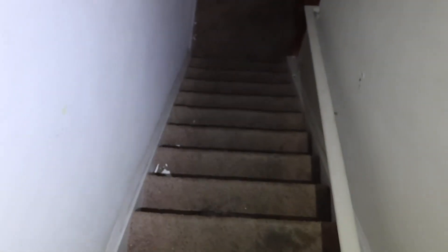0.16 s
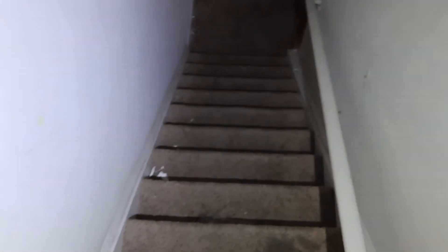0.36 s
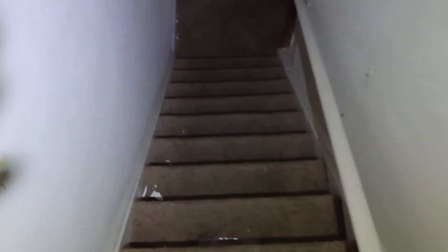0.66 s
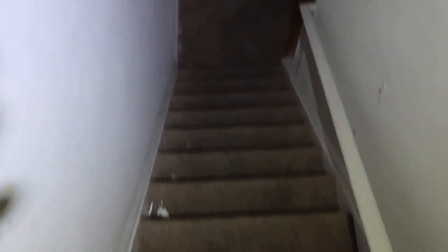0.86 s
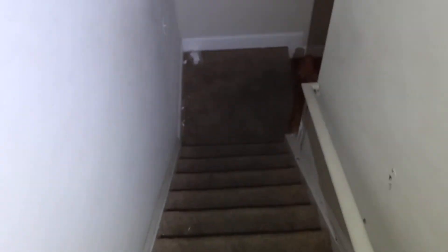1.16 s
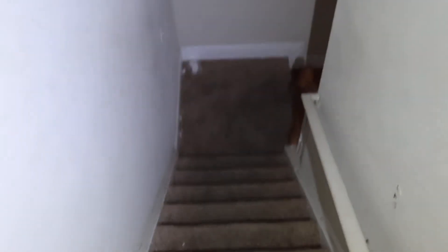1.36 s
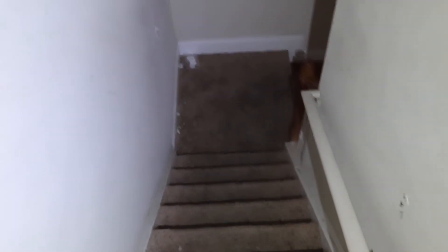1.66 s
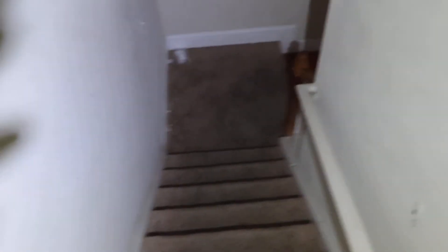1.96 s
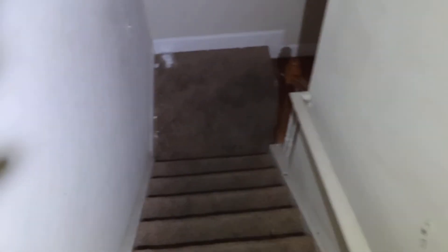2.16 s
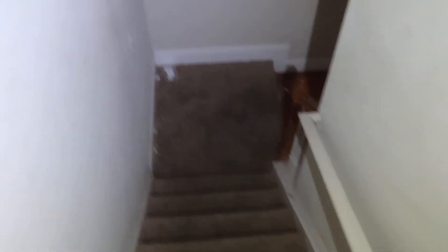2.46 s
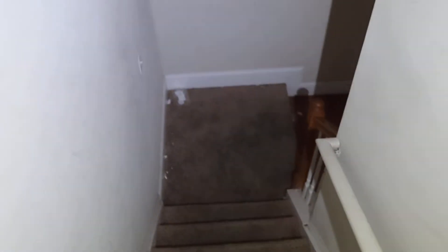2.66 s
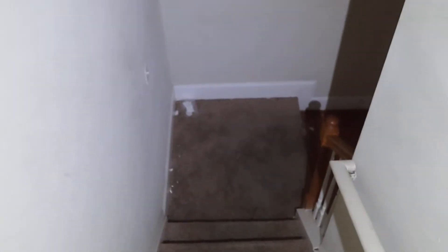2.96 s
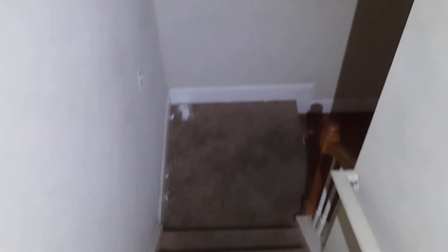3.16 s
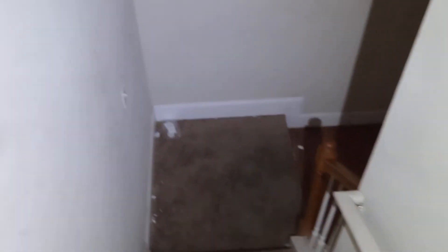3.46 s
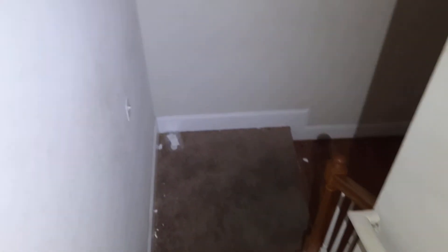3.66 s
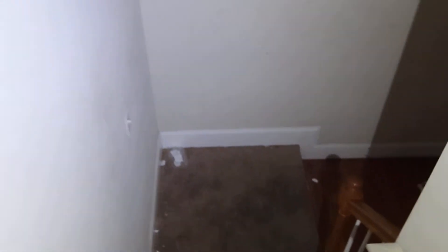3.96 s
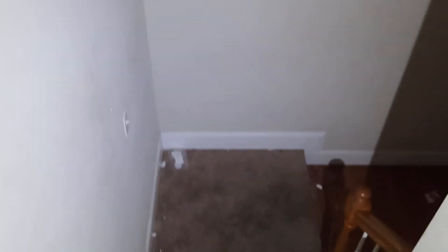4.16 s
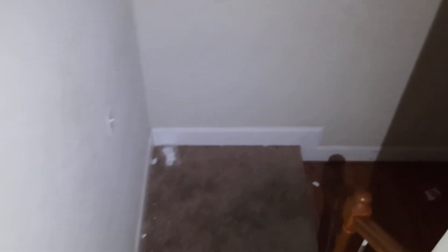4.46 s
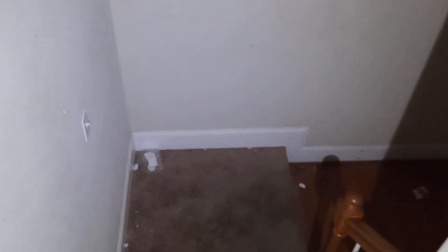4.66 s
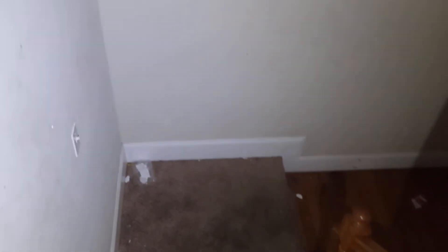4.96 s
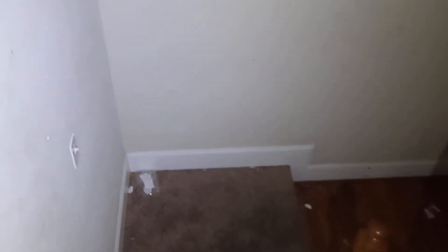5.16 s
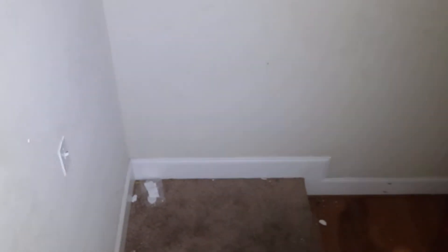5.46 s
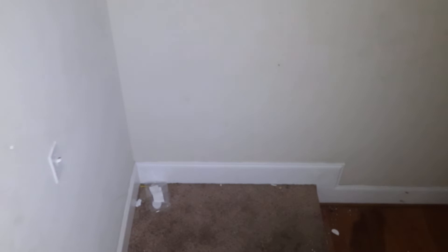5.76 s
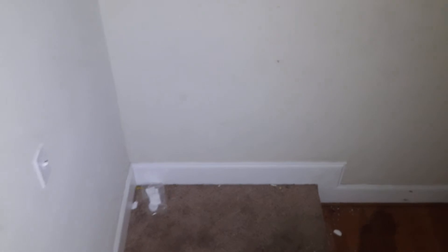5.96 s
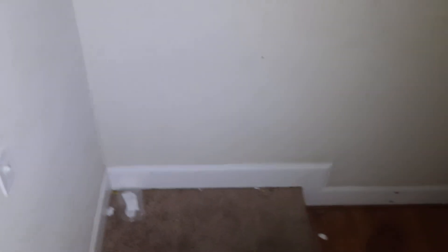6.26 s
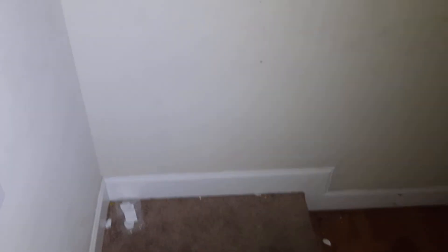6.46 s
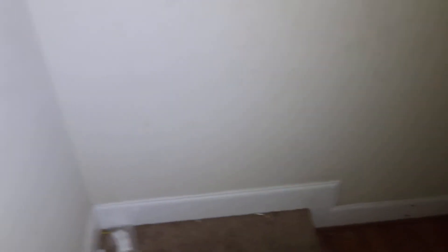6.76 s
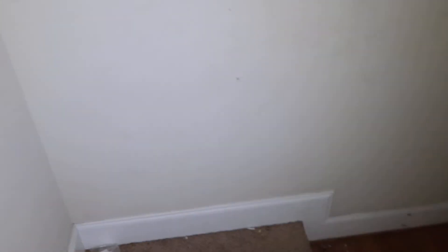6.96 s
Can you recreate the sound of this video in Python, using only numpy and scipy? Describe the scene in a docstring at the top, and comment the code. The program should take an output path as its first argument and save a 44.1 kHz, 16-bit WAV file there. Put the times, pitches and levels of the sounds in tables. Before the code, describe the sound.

Muffled footsteps descend a carpeted staircase, boards knocking, soles scuffing and clothing brushing the microphone, with a deep heavier step near six seconds.

```python
"""A woody knock in the still air of an empty house, then someone walks down carpeted wooden stairs.
Each foot lands as a soft thump of a damped board, and the treads knock in frame modes and dense noise.
Filtered noise rubs as the sole moves over the pile; now and then clothing brushes the housing of the
carried microphone and rings its resonances. The heaviest step comes late; bare walls return an echo."""
import sys
import numpy as np
from scipy import signal
from scipy.fft import rfft, irfft, next_fast_len
from scipy.io import wavfile

SR = 44100
rng = np.random.default_rng(int(sys.argv[2]) if len(sys.argv) > 2 else 0)


def output_pcm(signal):
    """Save a mono or channel-first signal as 16-bit PCM at the path in sys.argv[1].

    Samples are clipped to [-1, 1] before scaling.
    """
    pcm = np.clip(np.atleast_2d(signal).T, -1, 1) * 32767
    wavfile.write(sys.argv[1], SR, np.round(pcm).astype(np.int16))


N = 313110
TIME = np.arange(N) / SR
RING_TIME = TIME[:SR // 2]   # s
CUTOFF_HZ = 15600


def from_db(db):
    """Decibels to gain."""
    return 10 ** (np.asarray(db) / 20)


def rms_one(x):
    """Scale to unit rms."""
    return x / np.sqrt(np.mean(x ** 2) + 1e-20)


def at_hz(points, hz):
    """Read a table on a log-frequency axis."""
    points = np.array(points)
    return np.interp(np.log(np.maximum(hz, 1)), np.log(points[:, 0]), points[:, 1])


def add(out, s, sound):
    """Mix a sound in from time s."""
    start = max(0, round(s * SR))
    out[..., start:start + sound.shape[-1]] += sound[..., :N - start]


def low_pass(x, hz, order=2):
    """Causal Butterworth low-pass."""
    sos = signal.butter(order, min(hz, SR / 2 - 1), fs=SR, output="sos")
    return signal.sosfilt(sos, x + 1e-18)


def left_right(mid, side):
    """Two channels from their sum and difference."""
    return np.array([mid + side, mid - side])


def flutter(per_s, depth_db, size=N):
    """A gain that wanders at random between per_s points a second."""
    wander = np.interp(TIME[:size] * per_s, np.arange(size), rng.standard_normal(size))
    return from_db(depth_db * wander)


def swell(t, rise_s, fade_s):
    """Pressure of a rubbing contact: it builds, rounds off at 1 when t is 0, and lets go."""
    scaled = np.where(t < 0, t / rise_s, t / fade_s)
    return np.exp(1 - np.hypot(1, scaled * np.sqrt(2)))


def steady_noise(spectrum, width, size=N):
    """Stereo noise of a given colour and width; its middle has rms 1."""
    padded = next_fast_len(size)
    hz = np.arange(padded // 2 + 1) * SR / padded
    colour = from_db(at_hz(spectrum, hz)) * (hz < CUTOFF_HZ) * (hz > 20)
    mid, side = rfft(rng.standard_normal((2, padded))) * colour
    mid, side = irfft([mid, side * from_db(at_hz(width, hz))], padded)[:, :size]
    return left_right(mid, side) / np.std(mid)


# Centres of the bands that decay separately, in Hz.
BAND_HZ = np.array([150, 600, 2400, 9600])


def noise_bands(spectrum, width):
    """Coloured stereo noise split into four overlapping bands: (band, channel, time)."""
    noise = steady_noise(spectrum, width, size=2 * SR)
    hz = np.arange(SR + 1) / 2
    shares = [at_hz(np.column_stack([BAND_HZ, own]), hz) for own in np.eye(len(BAND_HZ))]
    return np.array([irfft(rfft(noise) * share) for share in shares])


def dying(t60_s):
    """Exponential decay, 60 dB down after t60_s (10 ms at least)."""
    return np.exp(-np.log(1000) * RING_TIME / np.maximum(t60_s, .01))


def dense_ring(bands, t60s):
    """Countless modes at once: a random stretch of noise in which each band dies at its own rate."""
    start = rng.integers(bands.shape[-1] - len(RING_TIME))
    stretch = bands[..., start:start + len(RING_TIME)]
    return np.einsum("bct,bt->ct", stretch, dying(t60s[:, None]))


# Still air of the house. Each row: frequency in Hz, relative density in dB per Hz.
HOUSE_AIR = [(15, -1), (25, 11), (49, -0.5), (101, 1.5), (289, -5.5), (433, -7.5), (469, -8), (598, -12.5),
             (1300, -13.5), (1900, -20.5), (2060, -28), (3630, -23), (12000, -37.5), (15500, -48)]
# Stereo width of the air. Each row: frequency in Hz, side minus mid in dB.
AIR_WIDTH = [(60, -29), (110, -10.5), (200, -2.5), (380, 2.5), (700, 0.5), (1290, -2.5), (2380, 5.5),
             (4400, -4), (8120, -19), (15000, -30)]


def house_air(air_db=-50.0):
    """Still air: steady noise, strongest in the bass."""
    return from_db(air_db) * steady_noise(HOUSE_AIR, AIR_WIDTH)


# Decay of the bare stairwell. Each row: frequency in Hz, t60 in s.
HALL_T60 = [(150, 0.42), (600, 0.41), (2400, 0.45), (9600, 0.35)]
# Colour of its tail. Each row: frequency in Hz, relative density in dB per Hz.
HALL_COLOUR = [(50, 7.5), (400, 6), (2000, 5), (15000, -3)]
# Width of its tail. Each row: frequency in Hz, side minus mid in dB.
HALL_WIDTH = [(60, -64), (300, -30), (2000, -27), (8000, -3)]


def stairwell(x, wet_db=-12, first_echo_s=0.003):
    """Bare walls return a diffuse tail."""
    air = noise_bands(HALL_COLOUR, HALL_WIDTH)
    onset = np.clip(RING_TIME / first_echo_s - 1, 0, 1)
    tail = dense_ring(air, at_hz(HALL_T60, BAND_HZ)) * onset
    tail = tail / np.linalg.norm(tail[0])
    return from_db(wet_db) * signal.fftconvolve(x, tail, axes=-1)[:, :N]


def side_walls(x, echo_db=-9, sway_db=2.0):
    """The two close walls each return one echo, whose delay wanders as the walker sways."""
    out = x.copy()
    for delay_s in (.0031, .0054):
        sent = TIME - delay_s * flutter(3, sway_db)
        out += from_db(echo_db) * np.array([np.interp(sent, TIME, channel) for channel in x])
    return out


# Strides. Each row: peak in seconds, sole in dB before sole_db, clothes in dB before cloth_db,
# swell in s, fade in s.
STRIDES = [(.65, -44.5, -62.5, 0.15, 0.28), (1.21, -39, -60, 0.11, 0.17), (2.1, -41, -60, 0.14, 0.16),
           (2.675, -38.5, -60.5, 0.12, 0.089), (3.41, -44, -60.5, 0.17, 0.21),
           (3.96, -38.5, -59, 0.077, 0.12), (4.71, -46, -62.5, 0.17, 0.2), (5.36, -43, -65, 0.16, 0.12),
           (6.27, -44, -67.5, 0.17, 0.24), (6.77, -41, -62.5, 0.093, 0.085)]
# Lighter scuffs as the weight shifts. Each row: peak in seconds, sole in dB before sole_db.
SCUFFS = [(.12, -52), (1.02, -44), (1.579, -54.5), (1.9, -53), (2.46, -47), (3, -53.5), (3.79, -45.5),
          (4.33, -48.5), (4.53, -50), (5.12, -47), (5.6, -55), (5.98, -52.5), (6.6, -47.5), (6.87, -45)]
# Rubbing sole. Each row: frequency in Hz, relative density in dB per Hz.
SOLE = [(30, -23), (70, 7), (180, 3.5), (300, 0.5), (460, 2.5), (750, -5), (1200, -9), (2300, -13.5),
        (3500, -20.5), (6000, -30), (15000, -48.5)]
# Rustling clothes. Each row: frequency in Hz, relative density in dB per Hz.
CLOTH = [(200, -10), (480, 14), (1000, 7.5), (2200, 11.5), (3400, 5), (4800, 2), (6500, -2.5), (8600, -9),
         (11500, -15), (15000, -18)]
# Stereo width of the steps. Each row: frequency in Hz, side minus mid in dB.
STEP_WIDTH = [(60, -42), (200, -65), (700, -21), (1300, -16), (2400, -12.5), (4400, -5.5), (8000, 1),
              (15000, 10)]
# Stereo width of the clothes. Each row: frequency in Hz, side minus mid in dB.
CLOTH_WIDTH = [(200, -37), (1300, -23), (2400, -8.5), (4400, -5), (7000, 0.5), (10000, 6), (15000, 8)]
SCUFF_SWELL_S, SCUFF_FADE_S = 0.079, 0.073
SCUFF_CLOTH_DB = -27   # clothes relative to sole, before both gains
IDLE_SOLE_DB, IDLE_CLOTH_DB = -59.5, -72.5   # never quite still; before both gains


def friction(sole_db=2.0, cloth_db=12.5, sole_grain_db=1.0, cloth_grain_db=1.5,
             shifts_per_s=25, shift_db=1.5):
    """Soles catch and slip in the pile, clothes rustle with each stride and scuff: fluttering noise."""
    scuffs = [(s, db, db + SCUFF_CLOTH_DB, SCUFF_SWELL_S, SCUFF_FADE_S) for s, db in SCUFFS]
    t = TIME[::50]
    power = from_db([[IDLE_SOLE_DB], [IDLE_CLOTH_DB]]) ** 2
    for s, rub_db, rustle_db, rise_s, fade_s in [*STRIDES, *scuffs]:
        power = power + (from_db([[rub_db], [rustle_db]]) * swell(t - s, rise_s, fade_s)) ** 2
    rub, rustle = [np.interp(TIME, t, np.sqrt(layer)) for layer in power]
    rub = rub * flutter(shifts_per_s, shift_db) * flutter(130, sole_grain_db)
    rustle = rustle * flutter(250, cloth_grain_db)
    sole = from_db(sole_db) * rub * steady_noise(SOLE, STEP_WIDTH)
    cloth = from_db(cloth_db) * rustle * steady_noise(CLOTH, CLOTH_WIDTH)
    return sole + cloth


CATCHES_PER_S, CATCH_DB = 500, 2.8   # quick uneven catches of dragged cloth
FITS_PER_S, FITS_DB = 70, 3   # slower fits
# Cloth sliding to a stop. Each row: start in seconds, level in dB before the pressure envelope,
# length in s, starting pitch in Hz.
SWISHES = [(0.85, -65, 0.036, 8200), (0.89, -60, 0.1, 4700), (2.162, -54, .09, 6430),
           (2.227, -58.5, 0.12, 5040), (3.542, -58, 0.078, 5380), (4.85, -53, 0.063, 5260),
           (6.316, -53.5, 0.079, 6920)]
SWISH_WIDTH_HZ = 600
SWISH_REST_HZ, SWISH_SLOWING_S = 4150, 0.071   # pitch sinks towards rest


def swishes(side_db=-4):
    """Threads pass at a rate set by the speed of the cloth: a rough hiss that falls in pitch."""
    out = np.zeros((2, N))
    size = len(RING_TIME)
    for s, db, length_s, start_hz in SWISHES:
        hz = SWISH_REST_HZ + (start_hz - SWISH_REST_HZ) * np.exp(-RING_TIME / SWISH_SLOWING_S)
        uneven = low_pass(rng.standard_normal((2, size)), SWISH_WIDTH_HZ / 2)
        uneven = uneven * flutter(CATCHES_PER_S, CATCH_DB, size=size)
        mid, side = rms_one(uneven * np.sin(2 * np.pi * np.cumsum(hz) / SR))
        pressure = np.sin(np.pi * np.minimum(RING_TIME / length_s, 1))
        pressure = pressure * flutter(FITS_PER_S, FITS_DB, size=size)
        add(out, s, from_db(db) * pressure * left_right(mid, side * from_db(side_db)))
    return out


def resonate(x, hz, width_hz):
    """A two-pole resonance with gain 1 at its top."""
    r = np.exp(-np.pi * width_hz / SR)
    zeros = np.array([1, 0, -1]) * (1 - r * r) / 2
    poles = [1, -2 * r * np.cos(2 * np.pi * hz / SR), r * r]
    return signal.lfilter(zeros, poles, x + 1e-18)


# Clothing on the housing. Each row: peak in seconds, drag in dB before drive_db, swell in s, fade in s,
# rasp centre in Hz before detuning, rasp width in Hz, gain of low modes in dB, gain of high modes in dB.
BRUSHES = [(.675, -47, 0.033, 0.034, 2180, 400, 9, -0.5), (0.541, -60, 0.098, .05, 2205, 400, -3, -2),
           (.79, -43.5, 0.016, 0.036, 2250, 250, -1, 2.5), (.88, -47, 0.049, 0.055, 2270, 300, -5, 1),
           (.875, -36, 0.051, 0.031, 1830, 580, -2, -11.5), (2.235, -49.5, 0.044, 0.057, 2240, 298, 3, 3),
           (3.571, -39, 0.032, 0.021, 2020, 600, 2.5, 0), (4.706, -44.5, 0.018, 0.012, 2230, 500, -11, -3),
           (4.873, -35, 0.025, 0.024, 2200, 280, -1.5, -4), (5.972, -50.5, 0.02, 0.032, 2450, 784, -5, -17),
           (6.033, -51.5, .015, 0.03, 2900, 700, -18, -20), (6.19, -61.5, 0.088, .06, 2200, 400, 0, 4),
           (6.352, -40.5, 0.042, 0.015, 2030, 400, -2.5, -2),
           (6.373, -47.5, 0.021, 0.013, 2200, 400, 9.5, 9), (6.869, -46, 0.021, 0.011, 1900, 980, -2, -14)]
# Housing resonances. Each row: centre in Hz before detuning, width in Hz, gain in dB before the
# brush's own low or high gain, side minus mid in dB.
HOUSING = [(461, 102, 4.5, -36), (1010, 530, -16.5, -13), (2620, 370, -17.5, -5), (4500, 610, -20, 1),
           (6540, 890, -19, 0.5), (7170, 270, -24.5, 4), (9970, 210, -22, 9), (11330, 260, -25, 14.5),
           (12500, 1200, -36, 7), (14100, 180, -24, 12), (15150, 140, -23, 5)]
GRIP_DETUNE = .015   # relative spread


def brushes(drive_db=18, rasp_db=-8, body_hz=700, treble_hz=4000):
    """The weave catches unevenly on the housing and rings it, each mode in fits of its own."""
    out = np.zeros((2, N))
    t = RING_TIME - RING_TIME.mean()
    size = len(t)
    for s, db, rise_s, fade_s, rasp_hz, rasp_width_hz, body_db, treble_db in BRUSHES:
        drag = from_db(db + drive_db) * swell(t, rise_s, fade_s)
        drag = drag * flutter(CATCHES_PER_S, CATCH_DB, size=size)
        rasp = (rasp_hz, rasp_width_hz, rasp_db, -11)
        for hz, width_hz, mode_db, side_db in [*HOUSING, rasp]:
            push = drag * flutter(FITS_PER_S, FITS_DB, size=size) * rng.standard_normal((2, size))
            push = low_pass(push, max(2 * hz, treble_hz))   # soft cloth leaves little hiss above each mode
            gripped_hz = hz * (1 + GRIP_DETUNE * rng.standard_normal())
            mid, side = resonate(push, gripped_hz, width_hz)
            gain = from_db(mode_db + body_db * (hz < body_hz) + treble_db * (hz > treble_hz))
            add(out, s + t[0], gain * left_right(mid, side * from_db(side_db)))
    return out


# Skids of the sole. Each row: peak in seconds, level in dB before the swell, swell in s, fade in s,
# low-pass brightness in Hz.
SKIDS = [(.6, -31.5, 0.0027, 0.019, 2800), (.635, -42, 0.017, .025, 2426),
         (0.685, -41.5, .012, 0.027, 1500), (.853, -34, 0.014, 0.014, 3600),
         (.882, -38.5, .01, 0.012, 2800), (1.196, -44.5, 0.024, 0.017, 3500),
         (2.055, -45, 0.022, 0.029, 1800), (2.098, -35, 0.02, 0.02, 3420), (2.59, -43.5, .008, .015, 4200),
         (2.632, -42.5, 0.02, 0.018, 3800), (2.69, -39, 0.014, .03, 1600), (2.755, -47, 0.013, 0.019, 700),
         (3.405, -41, .018, .025, 4040), (5.405, -46, 0.056, 0.09, 890), (6.765, -40, .025, .04, 1500),
         (6.84, -48.5, 0.016, 0.025, 800)]
# One fibre letting go. Each row: frequency in Hz, relative density in dB per Hz.
PILE = [(100, -17), (250, -5), (480, 0), (800, 2.5), (1800, -6), (3000, -6), (6000, -17.5), (15000, -11)]
FIBRES_PER_S, FIBRE_SPREAD_DB, FIBRE_T60_S = 900, 3.5, .012


def skids():
    """Tufts of pile catch on the sole and snap free at random: a short gritty rub."""
    out = np.zeros((2, N))
    t, pile = RING_TIME - RING_TIME.mean(), noise_bands(PILE, STEP_WIDTH)
    size = len(t)
    for s, db, rise_s, fade_s, bright_hz in SKIDS:
        strength = np.minimum(rng.exponential(1, size), np.pi)
        sizes = from_db(FIBRE_SPREAD_DB * strength) * rng.choice([-1, 1], size)
        snaps = sizes * (rng.random(size) < FIBRES_PER_S / SR)
        fibre = dense_ring(pile, np.full(len(BAND_HZ), FIBRE_T60_S))
        grit = signal.fftconvolve(snaps[None], fibre, axes=-1)[:, :size]
        rub = swell(t, rise_s, fade_s) * rms_one(low_pass(grit, bright_hz))
        add(out, s + t[0], from_db(db) * rub)
    return out


CRACK_S, BOTTOMING_S = .004, .0035   # crack decay, delay of the push


def knock(wood, frame, bright_hz, t60_s, bottoming_gain=3.17, bottoming_hz=480, firm_hz=2200,
          treble_damping=0.11, rise_cycles=0.72):
    """A tread meets its riser: crack, push, frame modes and woody ring; soft contact is duller, slower."""
    ring = dense_ring(wood, t60_s * (BAND_HZ / 500) ** -treble_damping)
    ring = (1 + .5 * np.exp(-RING_TIME / CRACK_S)) * ring
    phase = (np.pi * bottoming_hz * (RING_TIME - BOTTOMING_S)) ** 2
    firmness = min(bright_hz / firm_hz, 1) ** 2
    push = bottoming_gain * firmness * (1 - 2 * phase) * np.exp(-phase)
    loading = 1 - np.exp(-RING_TIME * bright_hz / rise_cycles)
    return low_pass(loading * (ring + frame + push), bright_hz)


# Dense ring of the wood. Each row: frequency in Hz, relative density in dB per Hz.
WOOD = [(70, -51), (130, 8), (200, 0), (300, 5), (450, 0.5), (800, -0.5), (1800, -1.5), (3000, -10.5),
        (6000, -19), (15000, -28)]
TICKS_PER_S, TICK_SPREAD_DB = 4, 6
TICK_MAX_DB, TICK_BRIGHT_HZ, TICK_T60_S = -51, 650, .14


def ticks():
    """Boards tick as their load shifts: faint dull knocks at random moments."""
    out = np.zeros((2, N))
    wood, count = noise_bands(WOOD, STEP_WIDTH), int(TICKS_PER_S * TIME[-1])
    for when, weakness in rng.random((count, 2)):
        gain = from_db(TICK_MAX_DB - TICK_SPREAD_DB * weakness)
        add(out, when * TIME[-1], gain * knock(wood, 0, TICK_BRIGHT_HZ, TICK_T60_S))
    return out


def mode(hz, t60_s):
    """One struck resonance: a decaying sine."""
    return np.sin(2 * np.pi * hz * RING_TIME) * dying(t60_s)


# Modes of the staircase. Each row: frequency in Hz and gain in dB, both before each tread's random
# shift, t60 in s.
STAIR_MODES = [(90, -15.5, 0.13), (127.4, -5.5, 0.09), (182.3, -4, 0.13), (217, -11.5, 0.1),
               (263, -11.5, 0.2), (330.4, -10.5, 0.093), (366, -28, 0.27), (438.2, -12.5, 0.23),
               (449, -12, 0.15), (489, -16, 0.19), (559, -21, 0.19), (660, -4, 0.02)]


def staircase(count, spread_db=5.5, detune=0.007):
    """The frame's answer to a blow on each of several treads, which shift and weight the modes a little."""
    treads = []
    for tread in rng.standard_normal((count, len(STAIR_MODES), 2)):
        answer = 0
        for k, ((hz, db, t60_s), (size, shift)) in enumerate(zip(STAIR_MODES, tread)):
            gain = (-1) ** k * from_db(db + spread_db * size)
            answer = answer + gain * mode(hz * (1 + detune * shift), t60_s)
        treads.append(answer)
    return treads


# Knocks of the treads. Each row: start in seconds, level in dB, low-pass brightness in Hz,
# t60 of the woody ring at 500 Hz in s.
KNOCKS = [(.002, -31, 700, 0.23), (0.404, -29.5, 2950, 0.19), (.413, -31, 2000, 0.1),
          (.42, -29.5, 5500, 0.18), (.453, -29.5, 2500, 0.08), (.462, -32.5, 1210, 0.24),
          (1.059, -39, 1810, 0.22), (1.226, -29.5, 2800, 0.26), (1.242, -29.5, 2600, 0.18),
          (1.263, -29.5, 900, 0.14), (1.318, -37, 800, 0.16), (1.624, -42.5, 2100, .07),
          (1.723, -35, 696, 0.49), (1.749, -29.5, 2460, 0.094), (1.76, -28.5, 3930, 0.16),
          (1.777, -52, 1000, 0.086), (2.005, -32, 2540, 0.12), (2.017, -30, 2900, 0.1),
          (2.047, -25, 500, 0.16), (2.083, -30, 900, 0.1), (2.095, -37, 3220, 0.086), (2.35, -55, 700, .15),
          (2.678, -36, 1300, 0.097), (2.687, -33.5, 2000, 0.092), (2.72, -32.5, 680, 0.25),
          (3.128, -37.5, 540, 0.13), (3.311, -32.5, 1900, 0.032), (3.322, -32.5, 3220, 0.1),
          (3.396, -28.5, 450, 0.12), (3.428, -38, 700, .08), (3.568, -30.5, 890, 0.089),
          (3.88, -35.5, 696, 0.29), (4.004, -28, 1000, 0.28), (4.02, -24.5, 523, 0.28),
          (4.041, -34, 900, 0.11), (4.4, -36.5, 510, 0.15), (4.64, -28, 1040, 0.075),
          (4.66, -38.5, 950, .07), (4.756, -32.5, 597, 0.098), (5.276, -41, 500, 0.17),
          (5.302, -40, 704, 0.22), (5.399, -38, 600, 0.16), (5.457, -40, 500, 0.29),
          (5.597, -47, 600, 0.11), (6.056, -24.5, 328, 0.31), (6.133, -22, 340, 0.17),
          (6.156, -31, 496, 0.1), (6.175, -28, 332, 0.24), (6.73, -34, 687, 0.39), (6.809, -39, 600, 0.27),
          (7.04, -46, 500, .15)]


def knocks(modes_db=-2, heel_tilt=0.052, count=11):
    """Treads knock in turn down the stairs; a quick heel, brighter, shakes the frame less."""
    out = np.zeros((2, N))
    wood, treads = noise_bands(WOOD, STEP_WIDTH), staircase(count)
    for s, db, bright_hz, t60_s in KNOCKS:
        tread = treads[int(count * s / TIME[-1])]
        frame = from_db(modes_db) * (bright_hz / 1000) ** -heel_tilt * tread
        add(out, s, from_db(db) * knock(wood, frame, bright_hz, t60_s))
    return out


# Soft landings of a foot. Each row: start in seconds, level in dB, pitch of the loaded board in Hz,
# time until the weight stops it in s.
THUMPS = [(.406, -26, 126, 0.048), (.457, -30, 129, 0.037), (.707, -37, 123, 0.046),
          (.747, -35, 130, 0.035), (1.138, -33, 96, .04), (1.229, -25.5, 128, 0.037),
          (1.245, -36, 187, 0.022), (1.314, -33, 126, 0.027), (1.747, -27.5, 135, 0.039),
          (1.762, -34, 189, 0.054), (1.964, -23, 97.5, 0.038), (2.004, -27.5, 125, 0.045),
          (2.067, -24, 122, 0.016), (2.572, -29, 82.5, 0.012), (2.648, -25, 70.4, 0.015),
          (2.689, -27.5, 123, 0.03), (2.822, -40, 95, 0.035), (3.126, -39, 96, 0.023),
          (3.26, -27.5, 66, 0.037), (3.315, -23.5, 79.5, 0.011), (3.388, -31.5, 136.4, 0.04),
          (3.886, -26, 63, 0.053), (3.925, -33, 129, 0.019), (3.945, -21, 54.4, 0.02),
          (4.008, -34, 95, 0.032), (4.019, -20, 215, 0.01), (4.036, -29, 282, .02), (4.06, -38, 205, 0.043),
          (4.395, -34.5, 91, 0.016), (4.547, -21.5, 77.4, 0.029), (4.587, -25, 59.5, 0.026),
          (5.245, -27, 61.6, 0.051), (5.294, -38, 66.6, 0.029), (5.3, -39.5, 138, 0.037),
          (5.44, -37.5, 74, 0.033), (5.543, -36, 91, 0.016), (6.057, -13.5, 66, 0.021),
          (6.076, -17, 106.5, 0.037), (6.104, -19, 81, 0.024), (6.135, -36, 97, 0.039),
          (6.698, -23, 54.4, 0.017), (6.724, -37, 82, 0.027), (6.73, -35, 150.6, 0.046),
          (6.764, -24, 60, 0.037)]
# Hollow under the stairs. Each row: frequency in Hz, relative density in dB per Hz.
HOLLOW = [(28, 10), (45, -1), (80, 17), (130, 24), (220, -54), (600, -16), (2000, -62)]
RUMBLE_T60_S = 0.29


def thumps(cushion=1.86, frame_db=-9, rumble_db=-13, squash_s=0.00097, count=6):
    """Carpet muffles all above the board's lowest mode, soon stopped by weight; the hollow rumbles on."""
    out = np.zeros((2, N))
    treads, hollow = staircase(count), noise_bands(HOLLOW, STEP_WIDTH)
    loading = 1 - np.exp(-RING_TIME / squash_s)
    for k, (s, db, hz, stop_s) in enumerate(THUMPS):
        board = np.sin(2 * np.pi * hz * RING_TIME) * np.exp(-(RING_TIME / stop_s) ** 2)
        rumble = from_db(rumble_db) * dense_ring(hollow, np.full(len(BAND_HZ), RUMBLE_T60_S))
        blow = loading * (from_db(frame_db) * treads[k % count] - board + rumble)
        add(out, s, from_db(db) * low_pass(blow, cushion * hz))
    return out


def scene():
    """Steps, their echo and friction over the still air of the house."""
    contacts = thumps() + knocks() + ticks() + skids() + brushes() + swishes()
    return house_air() + stairwell(contacts) + side_walls(friction()) + contacts


def record(dry, bass_cut_hz=31):
    """The microphone loses the deepest bass, and the top is cut steeply."""
    bass_cut = signal.butter(2, bass_cut_hz, "high", fs=SR, output="sos")
    top_cut = signal.ellip(12, .1, 80, CUTOFF_HZ, fs=SR, output="sos")
    return signal.sosfilt(top_cut, signal.sosfilt(bass_cut, dry))


dry = scene()
out = record(dry)
output_pcm(out)
```